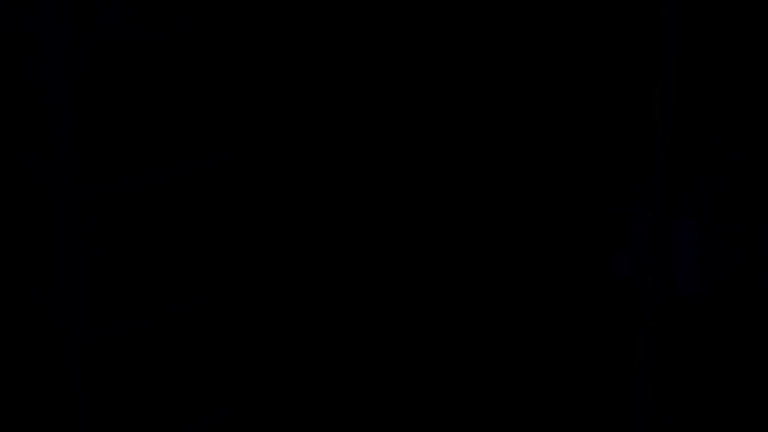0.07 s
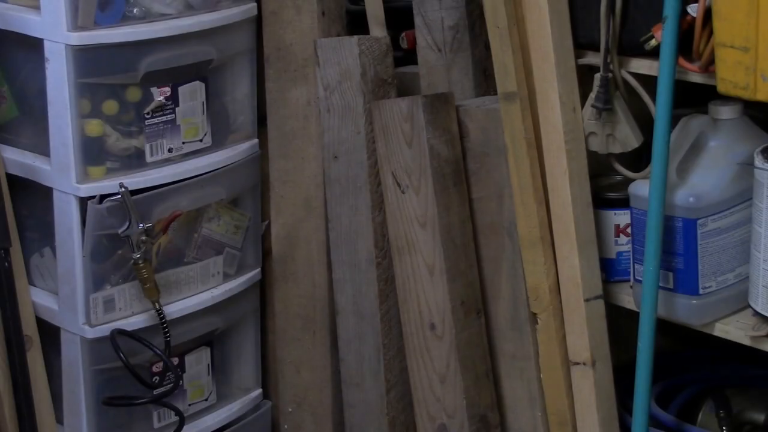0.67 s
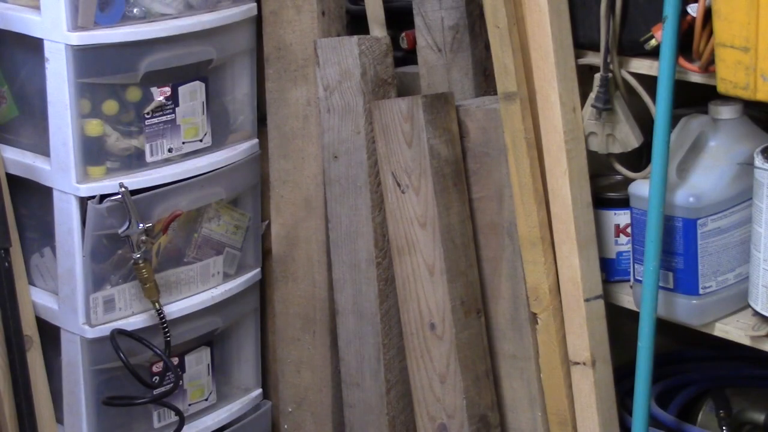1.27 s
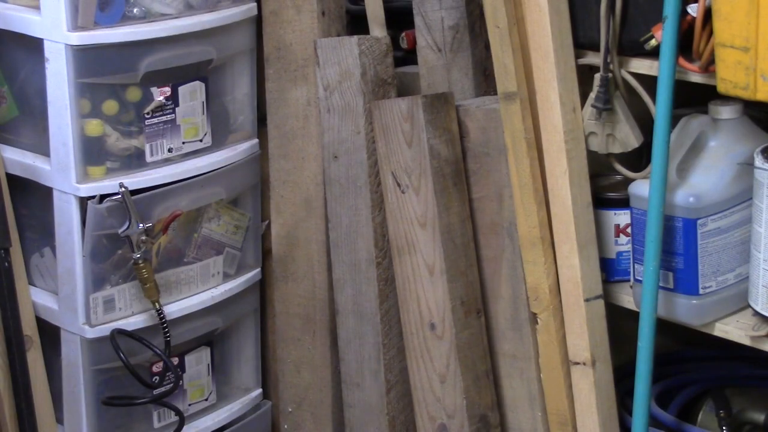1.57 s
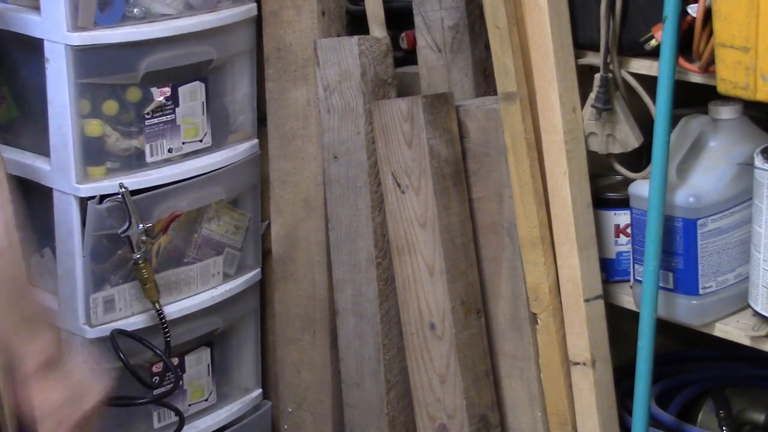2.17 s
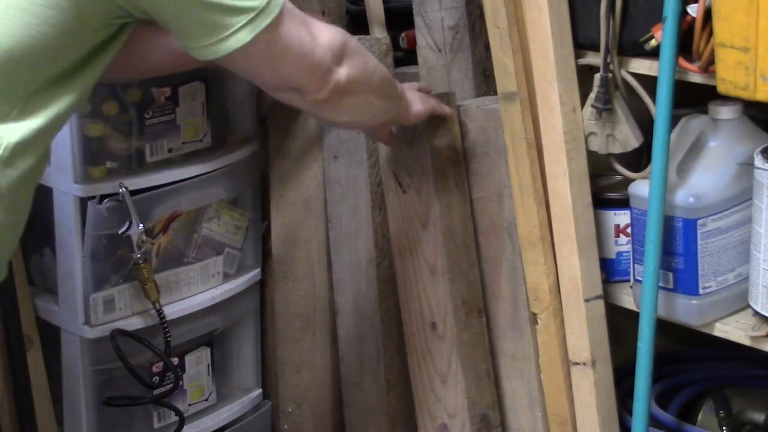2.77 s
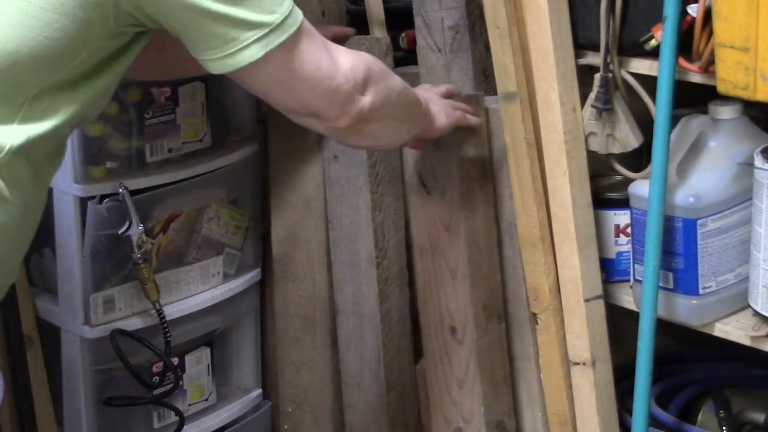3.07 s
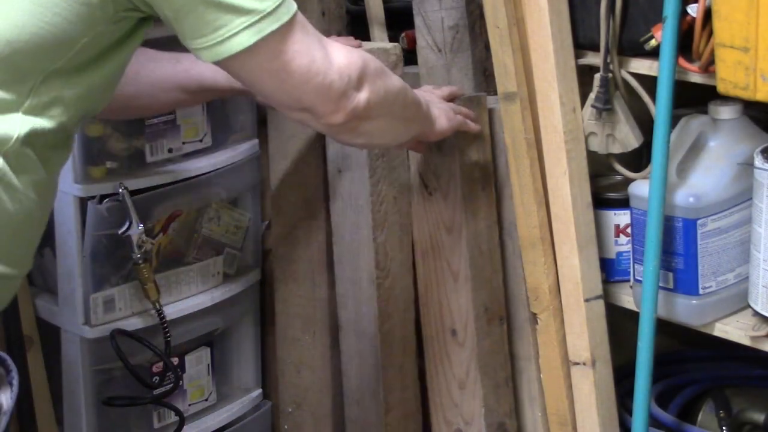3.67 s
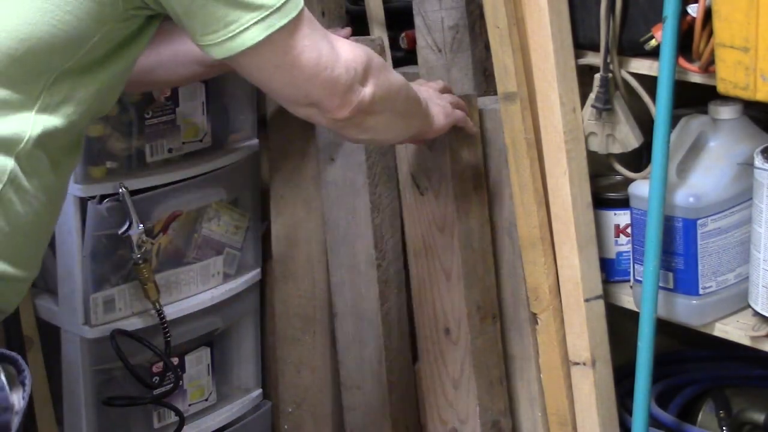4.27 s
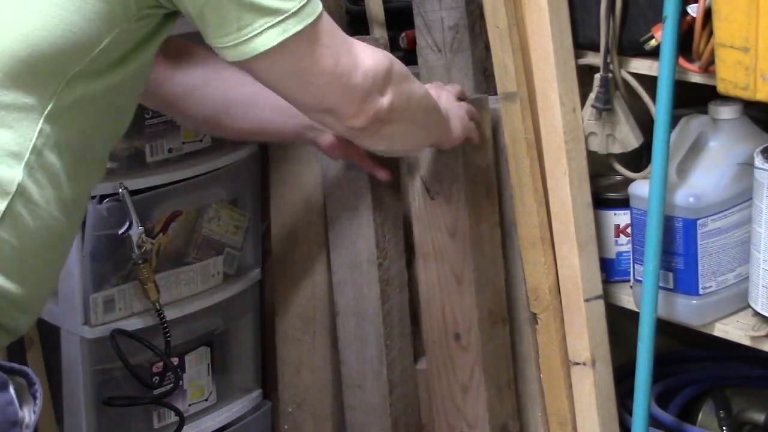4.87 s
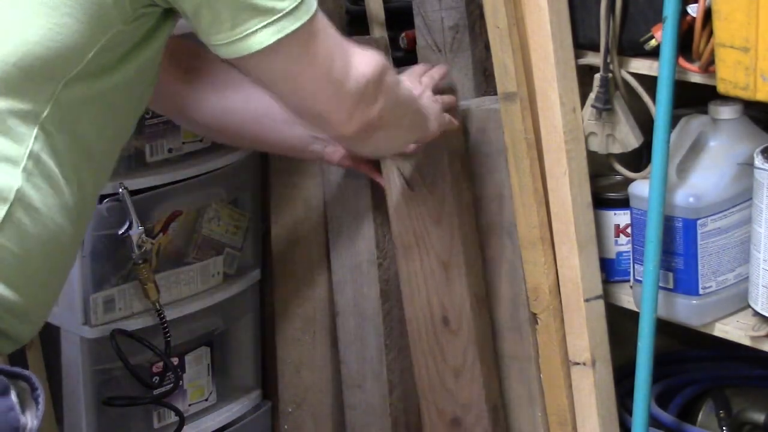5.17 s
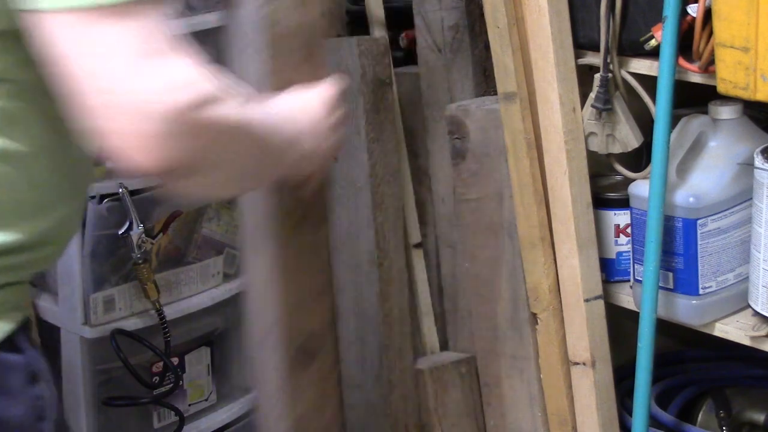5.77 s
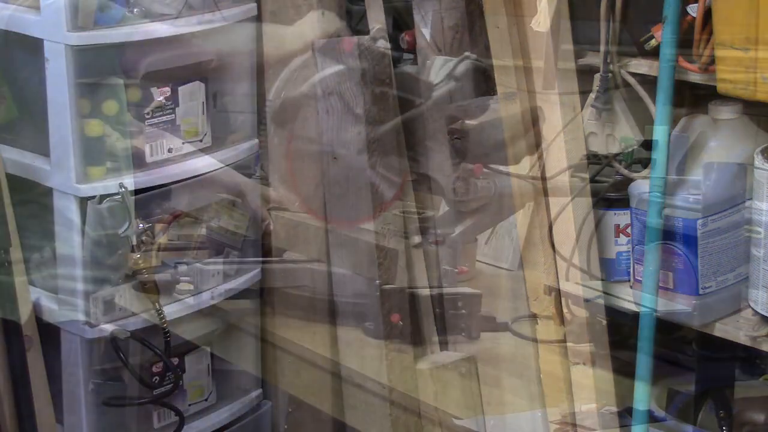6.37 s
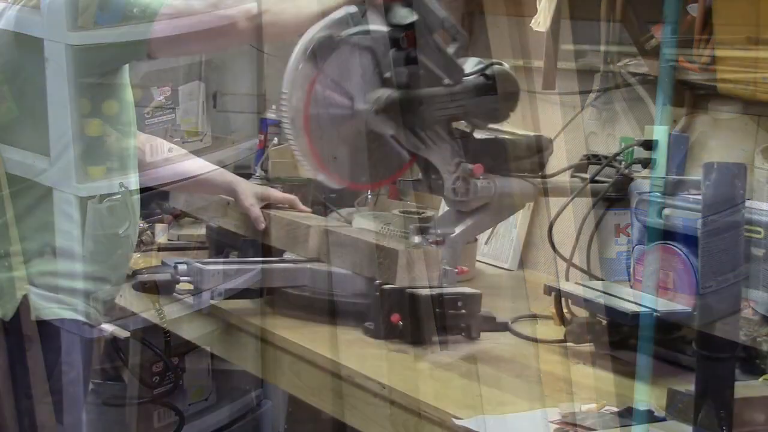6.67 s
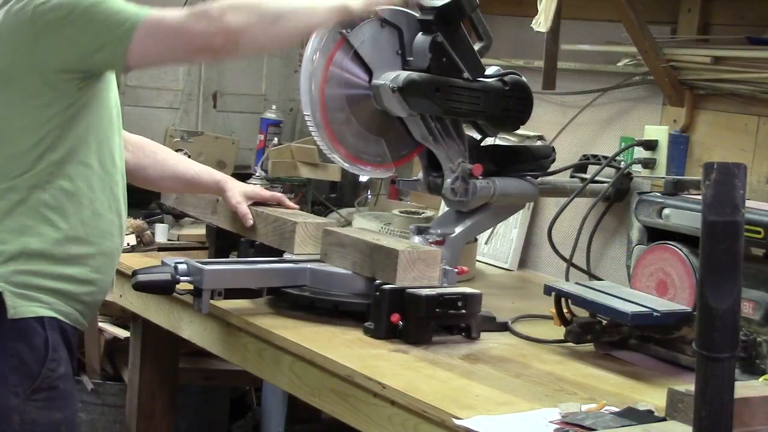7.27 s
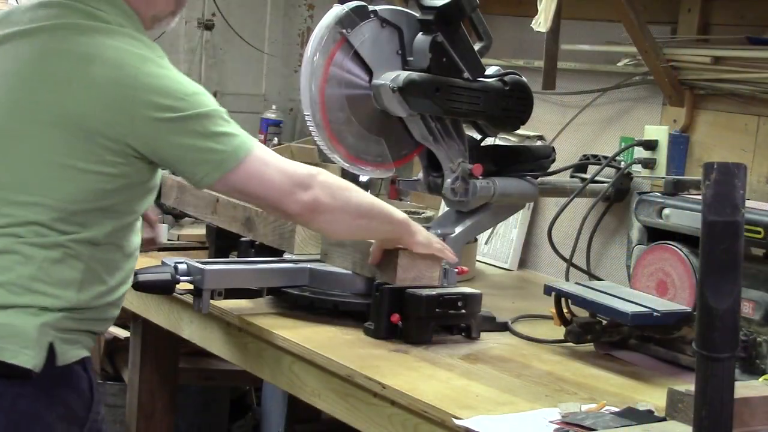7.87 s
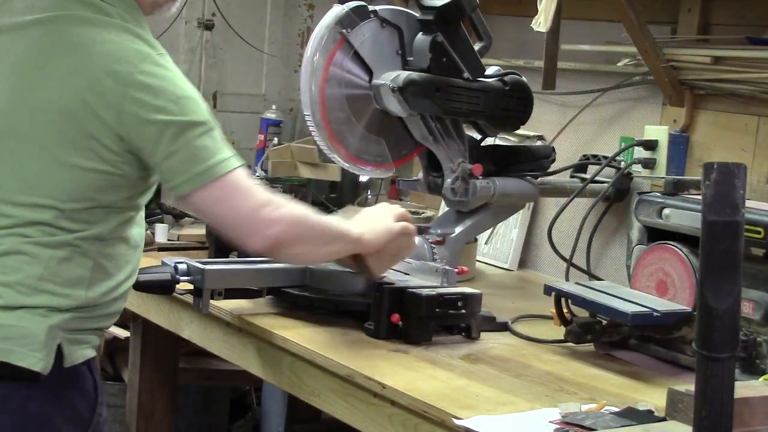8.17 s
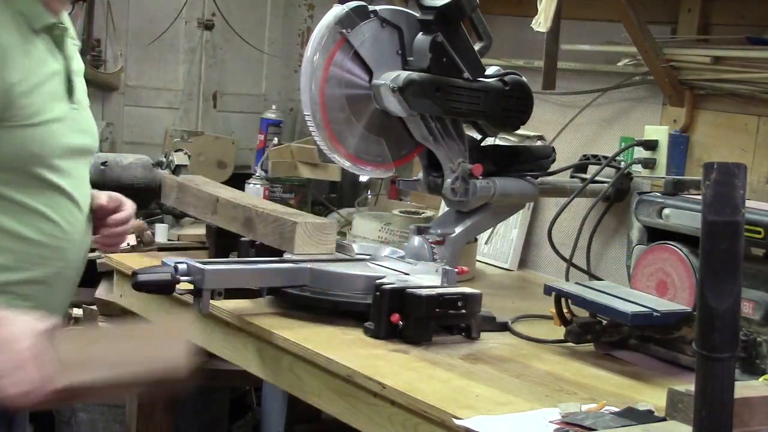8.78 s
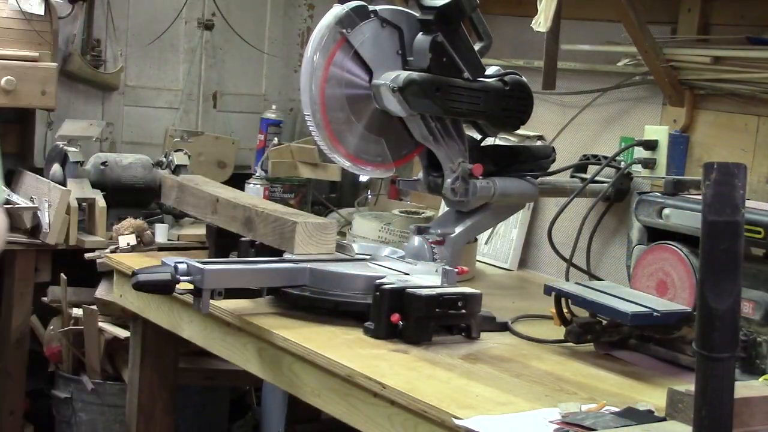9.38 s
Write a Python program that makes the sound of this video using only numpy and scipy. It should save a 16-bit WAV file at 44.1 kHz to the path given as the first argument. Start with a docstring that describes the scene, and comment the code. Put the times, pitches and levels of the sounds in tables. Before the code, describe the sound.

In a small workshop, soft room tone gives way to shoe scuffs, rustling sleeves and a tiny jingle. A loose plank rocks with a sharp thunk, then a board scrapes and knocks against others as it is pulled from a stack. A miter saw fades in, already coasting down, with a falling gear whine, rattle and blade hiss. Several metallic clanks ring as it slows. Everything sounds close and centered, with short echoes.

```python
"""A miter saw coasts down after a cut in a small workshop: its gears whine and rattle in the housing,
the blade hisses, whistles and throbs once a turn, and near the end the slack gears clank.
Before the saw fades in, someone steps up to a stack of lumber and pulls a board out: shoes and
sleeves rub, a loose plank rocks, and the board scrapes and knocks against its neighbours.
Soft room tone with faint electrical whines and beeps lies underneath."""
import sys
import numpy as np
from scipy import signal
from scipy.fft import rfft, irfft
from scipy.io import wavfile

SR = 44100
rng = np.random.default_rng(int(sys.argv[2]) if len(sys.argv) > 2 else 0)


def transcribe(u):
    """Save the signal u as a 16-bit wav file named by the first command-line argument.

    u: samples, shape (n,) or (channels, n), limited to [-1, 1]; the rate is SR.
    q: integer samples, one column per channel.
    """
    v = np.clip(np.atleast_2d(u).T, -1, 1)
    q = np.round(v * 32767).astype(np.int16)
    wavfile.write(sys.argv[1], SR, q)


N = 423801
TIME = np.arange(N) / SR
HIT_TIME = TIME[:SR // 2]
HZ = np.maximum(np.fft.rfftfreq(2 * N, 1 / SR), 1)
SAW_START_S = 6.14
BLADE_PER_SHAFT = .179   # blade turns per turn of the motor shaft


def from_db(db):
    """Decibels to amplitude."""
    return 10 ** (np.asarray(db) / 20)


def rms_one(x):
    """Scale to an rms of 1."""
    return x / np.sqrt(np.mean(x ** 2) + 1e-20)


def peak_one(x):
    """Scale to a peak of 1."""
    return x / (np.abs(x).max() + 1e-20)


def curve_db(points):
    """An EQ curve through (Hz, dB) points on a log-frequency axis."""
    hz, db = np.transpose(points)
    return np.interp(np.log(HZ), np.log(hz), db)


def lifts(resonances):
    """An EQ curve in dB with one bell per resonance."""
    return sum(lift / (1 + (2 * (HZ - hz) / width) ** 2) for hz, width, lift in resonances)


def colour(x, db):
    """Play a sound through an EQ curve."""
    return irfft(rfft(x, 2 * N) * from_db(db))[:N]


def band(x, low_hz, high_hz, order=4):
    """Band-pass filter."""
    sos = signal.butter(order, [low_hz, min(high_hz, .48 * SR)], "band", fs=SR, output="sos")
    return signal.sosfilt(sos, x + 1e-18)


def drift(per_s):
    """A random wander, rms 1."""
    return rms_one(np.interp(TIME * per_s, np.arange(2000), rng.standard_normal(2000)))


def grains(per_s):
    """Sparse clicks of random size, rms 1."""
    return rms_one((rng.random(N) < per_s / SR) * rng.standard_normal(N))


def wavering(pitch_hz):
    """A tone on a moving pitch, rms 1."""
    return rms_one(np.sin(2 * np.pi * np.cumsum(pitch_hz) / SR))


def burst(t60):
    """Noise that dies by 60 dB in t60 seconds."""
    return rng.standard_normal(len(HIT_TIME)) * from_db(-60 * HIT_TIME / t60)


def struck(modes, spread_db, polarity=-1):
    """Modes ring at varied strengths; neighbours start opposed, or in step with polarity 1."""
    return sum(polarity ** k * from_db(db + spread_db * rng.standard_normal())
               * np.sin(2 * np.pi * hz * HIT_TIME) * from_db(-60 * HIT_TIME / t60)
               for k, (hz, db, t60) in enumerate(modes))


def stroke(s, length, attack_s=.025, release_s=.026):
    """Friction builds up, holds and lets go."""
    return np.exp(-np.maximum(s - TIME, 0) / attack_s - np.maximum(TIME - s - length, 0) / release_s)


def add(out, s, sound):
    """Mix a sound in at s seconds."""
    start = int(s * SR)
    out[start:start + len(sound)] += sound[:N - start]


def room(x, wet_db, t60, gap_s=.011):
    """Direct sound and dense echoes off the cluttered walls."""
    echoes = burst(t60) * np.clip(HIT_TIME / gap_s - 1, 0, 1)
    return x + from_db(wet_db) * signal.fftconvolve(x, echoes / np.linalg.norm(echoes))[:len(x)]


def background():
    """Soft room tone with thin electrical whines and short, repeating beeps."""
    # room tone EQ: (frequency [Hz], level [dB])
    room_eq = [(15, -59), (25, -42), (75, -7), (107, -5), (233, -3), (267, -2), (389, -2), (421, -2),
               (1380, -10), (1620, -11.5), (2300, -13.5), (5430, -20), (7100, -21.5), (8810, -21.5),
               (15500, -38)]
    # electrical whines: (pitch [Hz], wander [Hz], level [dB])
    whines = [(1650, 45, -81), (8400, 90, -85)]
    # electrical beeps: (pitch [Hz], roughness [Hz], level [dB], first at [s], repeat [s], length [s])
    beeps = [(5561, 4, -80.5, .14, .157, .1), (8930, 60, -77, .17, .357, .06),
             (8330, 60, -79, .36, .345, .08)]
    out = from_db(-60) * rms_one(colour(rng.standard_normal(N), curve_db(room_eq)))
    for hz, wander_hz, db in whines:
        out += from_db(db) * wavering(hz + wander_hz * (drift(10) + .5 * drift(150)))
    for hz, rough_hz, db, first_s, repeat_s, length_s in beeps:
        loose_time = TIME - first_s + .035 * drift(4)
        from_centre_s = (loose_time + repeat_s / 2) % repeat_s - repeat_s / 2
        gate = 1 / (1 + (2 * from_centre_s / length_s) ** 8)
        out += from_db(db + 4 * np.tanh(drift(3))) * gate * wavering(hz + rough_hz * drift(200))
    return out


def rubs():
    """Shoes, sleeves and sliding wood: friction is a stream of tiny slips."""
    # strokes: (time [s], length [s], low rub [dB], scrape [dB], hiss [dB])
    strokes = [(1.888, 0.039, -48, -53.5, -64), (2.004, 0.21, -77, -64.5, -70),
               (2.401, 0.04, -52, -51.5, -54), (2.477, 0.078, -54.5, -67, -73),
               (2.76, 0.026, -63, -63, -60), (3.673, 0.034, -62, -68, -79), (3.74, 0.078, -57, -56, -63),
               (4.352, 0.045, -61, -55.5, -63), (4.975, 0.024, -81, -61, -56.5),
               (5.092, 0.1, -59, -57, -60.5), (5.237, 0.067, -52, -59, -57),
               (5.455, 0.029, -56, -61, -59.5), (5.59, 0.071, -50, -54.5, -56),
               (5.74, 0.16, -56.5, -59.5, -60.5), (5.966, 0.26, -59, -61.5, -68)]
    # friction EQ: (frequency [Hz], level [dB])
    rub_eq = [(60, -14), (150, 0.5), (400, -3), (800, -7.5), (1400, -7.5), (1900, -4.5), (3300, -10.5),
              (5000, -9.5), (8000, -13.5), (12000, -19), (15500, -33)]
    # board resonances woken by rubbing: (frequency [Hz], width [Hz], lift [dB])
    scrape_modes = [(367, 27, 6), (825, 110, 4), (1364, 53, 7.5), (2290, 75, 1), (3990, 82, -2),
                    (4240, 79, 4)]
    slips = rng.standard_normal(N) + .28 * grains(600)
    slips = colour(slips, curve_db(rub_eq) + lifts(scrape_modes)) * from_db(2.4 * drift(70))
    low, scrape, hiss = sum(np.outer(from_db(dbs), stroke(s, length)) for s, length, *dbs in strokes)
    out = low * rms_one(band(slips, 100, 700))
    out += scrape * rms_one(band(slips, 660, 6800))
    out += hiss * rms_one(band(slips, 3900, 18000))
    return room(out, wet_db=-13, t60=.44)


def squeaks():
    """Wood drags on wood: stick and slip settles briefly on a rough pitch."""
    # drags: (time [s], length [s], pitch [Hz], width [Hz], level [dB])
    drags = [(5.17, .1, 3900, 260, -65), (5.25, 0.044, 4200, 200, -64), (5.24, 0.044, 1300, 70, -57),
             (5.462, .045, 1350, 79, -55), (5.465, .04, 2330, 110, -65), (5.58, .07, 2000, 250, -59),
             (2.765, .02, 1380, 76, -59)]
    out = np.zeros(N)
    for s, length, hz, width, db in drags:
        squeak = band(rng.standard_normal(N), hz - width / 2, hz + width / 2, order=2)
        out += from_db(db) * stroke(s, length) * rms_one(squeak)
    return out


def ticks():
    """Splinters and fingernails give short, bright snaps."""
    # snaps: (time [s], level [dB])
    snaps = [(2.769, -34.5), (3.516, -44), (3.74, -42), (3.778, -43), (3.812, -40), (5.15, -51),
             (5.237, -47), (5.325, -45), (5.983, -42.5)]
    out = np.zeros(N)
    for s, db in snaps:
        add(out, s, from_db(db) * peak_one(band(burst(t60=.036), 1500, 10000, order=1)))
    return room(out, wet_db=-15, t60=.11)


def jingles():
    """Something small and hard jingles by a shoe under light, scratchy touches."""
    # touches: (time [s], level [dB])
    touches = [(1.869, -45), (1.879, -46), (1.889, -39), (1.903, -42), (1.921, -41)]
    # the object's bright ring: (frequency [Hz], level [dB], t60 [s])
    modes = [(2654, -7, 0.08), (2891, -4, .09), (3150, 0, 0.14), (3215, -1, .14), (3450, -8, .07),
             (3710, -8, .07), (3930, -4, .08), (5500, -9, .06), (6500, -11, .08)]
    out = np.zeros(N)
    for s, db in touches:
        scratch = band(burst(t60=.05), 2500, 7000, order=2)
        add(out, s, from_db(db) * peak_one(struck(modes, spread_db=7) + scratch))
    return room(out, wet_db=-5, t60=.2)


def plank():
    """A loose plank rocks on its foot and lands with a crack and a short, low thunk."""
    # landings: (time [s], peak [dB], contact noise against the ring [dB])
    landings = [(3.998, -16.5, 2), (4.014, -20.5, -10), (4.37, -42, -8)]
    # the plank's ring: (frequency [Hz], level [dB], t60 [s])
    modes = [(161, -5, 0.1), (304, -0.5, 0.1), (353, 4, 0.15), (376, 0, 0.11), (492, -2, 0.07),
             (565, -14, 0.064), (640, -1.5, 0.07), (820, -7, 0.057), (920, -4, 0.047), (1214, -9, 0.049),
             (1460, -11, 0.032), (1610, -12, 0.046), (2040, -16, 0.034), (2450, -17, 0.043),
             (3150, -21, 0.027), (3780, -20, 0.033)]
    attack = 1 - np.exp(-HIT_TIME / .0017)
    out = np.zeros(N)
    for s, db, contact_db in landings:
        contact = from_db(contact_db) * band(burst(t60=.049), 400, 2800, order=2)
        blow = room((struck(modes, spread_db=3) + contact) * attack, wet_db=-8.5, t60=.19)
        add(out, s, from_db(db) * peak_one(band(blow, 85, 6900, order=2)))
    return out


def board_knocks():
    """Footsteps and boards knocking against the stack: each thuds at its own pitch and shakes the stack and the
    floor."""
    # footsteps and knocks: (time [s], thud [dB], thud pitch [Hz], body [dB], clack [dB], crack [dB], floor
    # [dB])
    knocks = [(1.795, -37, 223, -49, -60, -56, -50), (1.913, -44, 260, -39, -52, -56, -59),
              (2.749, -46.5, 297, -52, -59, -59, -49), (5.15, -39, 267, -29.5, -33, -46, -43),
              (5.278, -9.5, 280, -18, -18, -38, -53), (5.299, -13.5, 295, -25, -26, -50, -56),
              (5.515, -10, 266, -5, -16, -34, -44), (5.543, -28, 255, -25, -30, -52, -52),
              (5.724, -25, 302, -38, -56, -64, -49), (5.864, -38, 195, -47, -62, -60, -44),
              (5.898, -22, 246, -31, -52, -62, -53), (6.073, -17, 262, -29.5, -46, -63, -50),
              (6.213, -26.5, 255, -45, -58, -61, -55), (6.363, -31, 254, -50, -60, -58, -56),
              (6.487, -32.5, 244, -46, -58, -58, -51)]
    # ring of the lumber stack: (frequency [Hz], level [dB], t60 [s])
    stack_modes = [(181.4, -1.5, 0.11), (229.7, -1.5, 0.082), (297.4, 0.5, 0.086), (460, -10.5, 0.1),
                   (548.6, 3.5, 0.076), (569, -2, 0.094), (634, 5.5, 0.098), (682, 6.5, 0.081),
                   (760, 2, 0.12), (799, 2.5, 0.047), (915, -0.5, 0.097), (992, 6.5, 0.065),
                   (1098, 0.5, 0.068), (1270, -8, 0.039), (1570, -6, .09), (1960, -9, .06),
                   (2680, -20, 0.076), (3120, -16, .05)]
    floor_modes = [(92, -8, .22), (129, -3, .041), (159, -5, .069)]   # same columns
    lead_s, floor_lag_s = .0005, .0117
    out = np.zeros(N)
    for s, thud_db, pitch_hz, body_db, clack_db, crack_db, floor_db in knocks:
        contact = from_db(8.5) * band(burst(t60=.095), 330, 3500, order=2)
        stack = struck(stack_modes, spread_db=2, polarity=1)
        bend = struck([(pitch_hz, 6, .065)], spread_db=.5)
        wood = room(stack + bend + contact, wet_db=-7, t60=.125)
        thud = from_db(thud_db) * peak_one(band(wood, 210, 380, order=3))
        body = from_db(body_db) * peak_one(band(wood, 520, 910, order=3))
        clack = from_db(clack_db) * peak_one(band(wood, 860, 1540, order=3))
        crack = from_db(crack_db) * peak_one(band(wood, 1520, 3100, order=2))
        add(out, s - lead_s, thud + body + clack + crack)
        thump = band(struck(floor_modes, spread_db=5), 50, 220, order=2)
        add(out, s + floor_lag_s, from_db(floor_db) * peak_one(thump))
    return out


def gear_clanks():
    """At low speed the gear teeth jump their slack and ring the blade."""
    # jolts: (time [s], peak [dB], favoured ring [Hz])
    jolts = [(8.868, -12, 3790), (8.92, -17, 3590), (8.972, -13, 2870), (9.148, -11.5, 3640),
             (9.158, -17, 3760), (9.21, -15, 3580), (9.422, -15, 3560)]
    # ring of the jolted blade: (frequency [Hz], level [dB], t60 [s])
    modes = [(1580, -14, 0.09), (2760, -7, 0.09), (2870, -10, 0.14), (3480, -1, 0.11), (3770, -6, 0.15),
             (4570, -20, .1)]
    out = np.zeros(N)
    for s, db, ring_hz in jolts:
        blade = struck(modes, spread_db=4) + struck([(ring_hz, 0, .14)], spread_db=1)
        add(out, s, from_db(db) * peak_one(room(blade, wet_db=-16, t60=.21)))
    return out


def shaft_speed():
    """Turns per s, coasting against constant bearing friction and air drag that goes with speed squared."""
    stop_s, friction = 10.698, 57.52   # friction in turns per s^2
    drag_speed = 316.72   # turns per s at which drag equals friction
    left_s = stop_s - np.maximum(TIME, SAW_START_S)
    return drag_speed * np.tan(friction / drag_speed * left_s)


def bearing(turns, speed):
    """As the shaft slows, the bearing balls click in step and give a comb of falling tones."""
    # comb: (pitch [multiple of ball pass], level [dB])
    harmonics = [(6, -35), (7, -35), (8, -37), (9, -32), (10, -34), (11, -37), (12, -35)]
    balls_per_turn, sings_below = 1.737, 125   # sings_below in turns per s
    angle = 2 * np.pi * balls_per_turn * turns + .04 * drift(45)
    comb = sum(from_db(db + 2.5 * drift(14)) * np.sin(k * angle) for k, db in harmonics)
    return comb * speed / sings_below / (1 + (speed / sings_below) ** 8)


def whistles(turns, speed):
    """Fitful whistling bands, gear and motor overtones and high tooth whistles, fall with shaft speed."""
    # bands: (pitch [x shaft speed], width [x shaft speed], level [dB], sounds from [Hz], to [Hz])
    bands = [(11.2, 2.2, -7.5, 2150, 3300), (11.1, .15, -13, 2500, 3100), (14, .15, -9, 2650, 2950),
             (21.2, 1.2, -7.5, 3350, 3950), (28.3, 1.5, -8, 3400, 4000), (22, 2, -9, 2650, 3050),
             (27.3, 3.2, -8.5, 6900, 8300), (56.7, 1.5, -28, 9400, 12300), (56.7, 1.5, -41, 12500, 14500),
             (85, 1.9, -29.5, 9200, 11800), (113.2, 2.2, -34.5, 9200, 11700),
             (141.4, 2.6, -41, 9600, 12200)]
    out = np.zeros(N)
    for multiple, width, db, low_hz, high_hz in bands:
        noise = rng.standard_normal(9000) + 1j * rng.standard_normal(9000)
        flutter = np.interp(turns * width, np.arange(9000), noise)
        whistle = np.real(flutter * np.exp(2j * np.pi * multiple * turns))
        pitch_hz = multiple * speed
        in_range = 1 / (1 + (low_hz / pitch_hz) ** 20 + (pitch_hz / high_hz) ** 20)
        out += from_db(db) * in_range * rms_one(whistle * from_db(2.2 * drift(20)))
    return out


def gear_whine(turns):
    """The pinion's whine flares in each gear case resonance, leaves it ringing and beats with echoes."""
    # gear case resonances: (frequency [Hz], width [Hz], level [dB])
    case_modes = [(450, 15, -21), (527, 7.6, -24.5), (576, 3.2, -6.5), (604, 5.6, -13.5), (661, 24, -14.5),
                  (722, 37, -21), (826, 11, -31), (896, 29, -18.5), (1100, 11, -26), (1151, 20, -13.5),
                  (1150, 19, -50), (1247, 25, -20.5), (1289, 19, -19), (1392, 21, -18.5), (1477, 94, -22.5),
                  (1548, 8.8, -21), (1576, 14, -19), (1700, 13, -15.5), (1787, 16, -16.5), (1870, 18, -35),
                  (2136, 75, -20.5)]
    teeth, direct_top_hz, wall_lag_s = 7, 2290, .022
    angle = 2 * np.pi * teeth * turns + .4 * drift(70)
    load = (1 + .33 * np.sin(2 * np.pi * BLADE_PER_SHAFT * turns)) * from_db(1.3 * drift(45))
    mesh = load * (np.sin(angle) + from_db(-15) * np.sin(2 * angle))
    case = from_db(-1) * sum(from_db(db) / (1 + 2j * (HZ - hz) / width) for hz, width, db in case_modes)
    direct = from_db(-38) / (1 + (HZ / direct_top_hz) ** 20)
    wall = 1 + from_db(-10) * np.exp(-2j * np.pi * HZ * wall_lag_s)
    tone = irfft(rfft(mesh, 2 * N) * (case + direct) * wall)[:N]
    return room(tone, wet_db=-12, t60=.22)


def saw():
    """Gear rattle and rotation tones ring the housing and blade, under falling whines and whistles."""
    # shaft, gear and bearing tones: (pitch [x shaft speed], level against the rattle [dB])
    orders = [(.89, -16), (1, -25), (1.19, -24), (1.78, -22), (2, -25), (2.66, -21), (3, -20), (3.22, -25),
              (3.55, -22), (4, -19), (5, -19), (6, -20.5), (7.96, -24), (8.78, -25), (10.5, -25),
              (11.12, -24), (12.2, -26), (12.95, -27), (14, -22), (15.7, -28), (21.05, -24), (22.2, -26),
              (28.3, -25)]
    # overall EQ of the machine: (frequency [Hz], level [dB])
    saw_eq = [(40, -77), (70, -26.5), (110, -29.5), (200, -43), (350, -17), (520, -3), (1000, -14),
              (2000, -11.5), (3800, -3.5), (5200, -10), (8000, -9.5), (9300, -23.5), (12000, -33),
              (15300, -49.5)]
    # housing and guard resonances: (frequency [Hz], width [Hz], lift [dB])
    housing = [(164.5, 25, 14.5), (178, 160, 15.5), (186, 25, 3.5), (286.4, 126, 14.5), (343.4, 13, 12),
               (516, 13, 6), (639, 110, 7.5), (729, 25, 11), (848, 150, 7.5), (1052, 154, 7.5),
               (1144, 38, 6), (1294, 320, 10.5), (1404, 8.4, 7), (1762, 685, 16)]
    # narrow rings of the steel blade: (frequency [Hz], width [Hz], lift [dB])
    blade_rings = [(2068, 240, 11.5), (2327, 60, 6), (2420, 77, 2.5), (2678, 56, 9.5), (2860, 58, 10.5),
                   (3010, 140, 6), (3243, 77, 5.5), (3466, 47, 7), (3560, 103, 9), (3770, 33, 9),
                   (3840, 50, 6.5), (3975, 55, 6), (4260, 29, 3), (4560, 29, 4), (4755, 110, 7.5),
                   (5090, 39, 4.5), (5236, 23, 5), (5465, 22, 5), (5626, 32, 9.5), (5880, 170, 7.5),
                   (6050, 250, 4.5), (6360, 30, 5.5), (6596, 200, 8), (6700, 45, 6), (6830, 45, 5.5),
                   (7090, 55, 4.5), (7373, 40, 3), (7800, 24, 2), (8037, 18, 1), (8165, 91, 4.5),
                   (8470, 40, 6), (8710, 20, 1), (9007, 19, -2), (9465, 39, 4)]
    # bench shake, gear rattle, housing ring, blade hiss, air rush: (from [Hz], to [Hz],
    # level at mid speed [dB], change per doubling of speed [dB], dies away below [turns/s])
    layers = [(40, 423, -41.5, -2, 79), (416, 1848, -21, -3.5, 100), (2172, 4560, -19, -0.5, 92),
              (4480, 9330, -23, -1.5, 113.7), (9120, 20000, -39, 5, 88)]
    mid_speed, fade_in_s = 175, .59   # mid_speed in turns per s
    speed = shaft_speed()
    turns = np.cumsum(speed) / SR
    tones = sum(from_db(db + 2.2 * drift(14)) * np.sin(2 * np.pi * k * turns + .025 * k * drift(45))
                for k, db in orders)
    rattle = rms_one(rng.standard_normal(N) + .5 * grains(7000))
    drive = rattle + room(tones, wet_db=-3, t60=.2)
    machine = colour(drive, curve_db(saw_eq) + lifts(housing) + lifts(blade_rings))
    out = from_db(-19) * whistles(turns, speed) + gear_whine(turns) + bearing(turns, speed)
    for low_hz, high_hz, db, db_per_doubling, low_speed in layers:
        layer = colour(machine, -20 * np.log10((1 + (low_hz / HZ) ** 20) * (1 + (HZ / high_hz) ** 20)))
        gain = from_db(db + db_per_doubling * np.log2(speed / mid_speed) + .7 * drift(14))
        die_away = 1 / np.sqrt(1 + (low_speed / speed) ** 6.16)
        out += gain * die_away * layer / layer[TIME > SAW_START_S].std()
    # the blade runs slightly out of true, so the gears load and unload once a turn
    blade_angle = 2 * np.pi * BLADE_PER_SHAFT * turns
    throb = 1 + .15 * np.sin(blade_angle) + .06 * np.sin(2 * blade_angle)
    fade_in = np.clip((TIME - SAW_START_S) / fade_in_s, 0, 1) ** .97
    return out * throb * fade_in


def scene():
    """Saw and lumber sit near the centre; faint wall echoes and room tone give a little width."""
    # EQ of the echoes in the side channel: (frequency [Hz], level [dB])
    side_eq = [(30, -10), (70, -72), (300, -30), (1000, -23.5), (2000, -22), (4000, -14), (8000, -14.5),
               (12000, -78)]
    near = saw() + gear_clanks() + board_knocks() + plank() + jingles() + rubs() + squeaks() + ticks()
    bed = background()
    echoes = room(near, wet_db=-4.5, t60=.19) - near
    side = colour(echoes, curve_db(side_eq)) + from_db(-8) * background()
    return near * from_db([[-.2], [.2]]) + bed * from_db([[-.7], [.7]]) + side * [[1], [-1]]


def record(dry):
    """The highest peaks are rounded and the top is cut steeply."""
    ceiling, cutoff_hz = .8, 15700
    rounded = dry / (1 + (dry / ceiling) ** 8) ** (1 / 8)
    return signal.sosfilt(signal.ellip(10, .1, 80, cutoff_hz, fs=SR, output="sos"), rounded)


dry = scene()
out = record(dry)
transcribe(out)
```